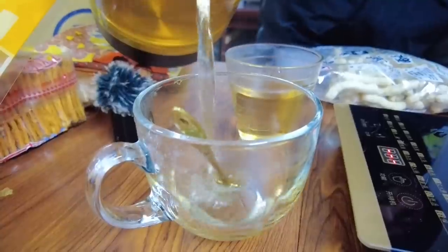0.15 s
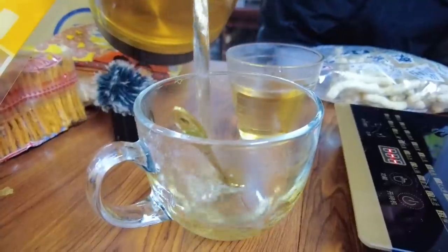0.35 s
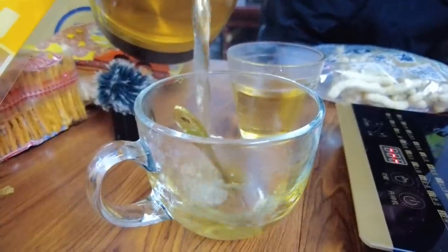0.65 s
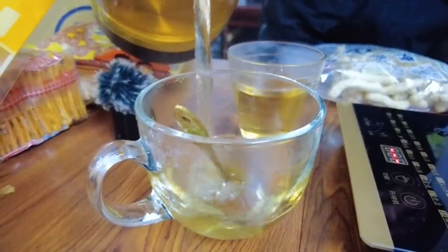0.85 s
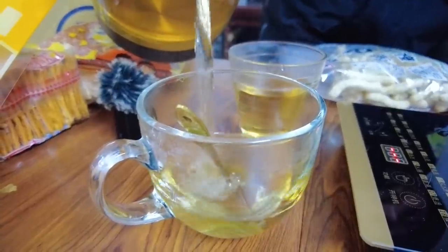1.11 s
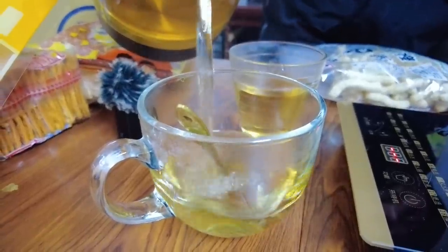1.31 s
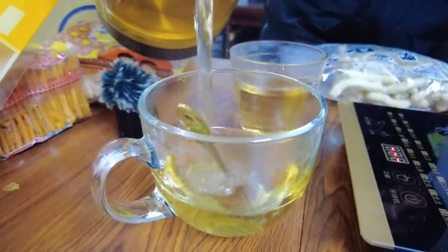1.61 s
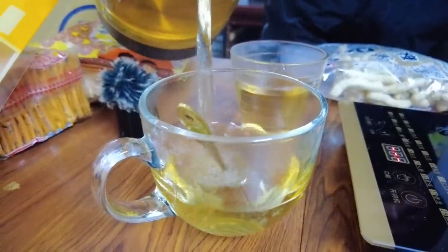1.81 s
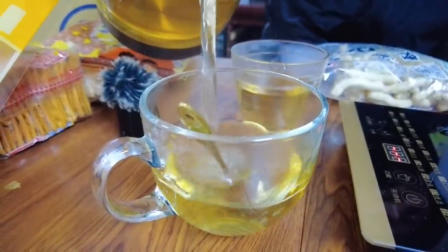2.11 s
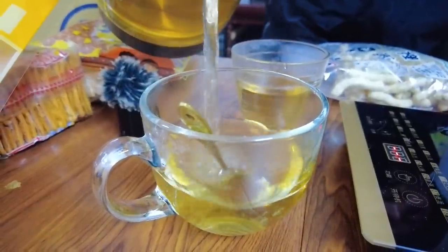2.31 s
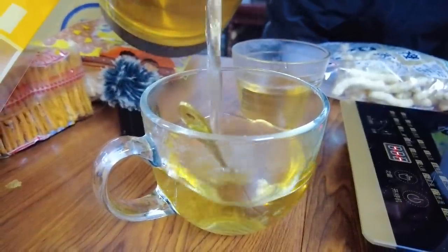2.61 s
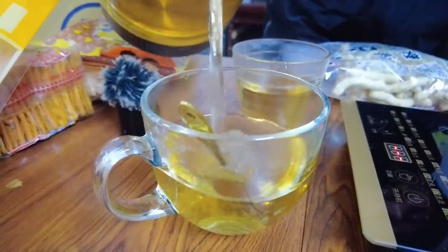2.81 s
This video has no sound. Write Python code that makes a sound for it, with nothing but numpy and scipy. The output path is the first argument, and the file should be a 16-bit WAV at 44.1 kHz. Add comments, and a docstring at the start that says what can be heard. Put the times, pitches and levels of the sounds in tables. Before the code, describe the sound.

Tea pouring steadily into a glass mug, splashing and plopping, with light spoon clinks.

```python
"""Tea pours from a kettle into a glass mug on a wooden table, close to the microphone.
From the start the stream churns and fizzes with tiny bubbles. It breaks into big blobs and many small
drops: each one plops, thumps the mug on the table and splashes. Almost at once, and then now and again,
the stream jogs the spoon, which clinks against the glass. Just before one second, a patch of froth hisses.
As the mug fills, the plops get shorter and the glass rings more briefly."""
import sys
import numpy as np
from scipy import signal
from scipy.fft import rfft, irfft, next_fast_len
from scipy.io import wavfile
from scipy.ndimage import map_coordinates

SR = 44100
rng = np.random.default_rng(int(sys.argv[2]) if len(sys.argv) > 2 else 0)


def dump(signal):
    """Clip the signal to [-1, 1] and save it as 16-bit WAV at the path in sys.argv[1]."""
    limited = np.clip(np.atleast_2d(signal).T, -1, 1)
    pcm = np.round(limited * 32767).astype(np.int16)
    wavfile.write(sys.argv[1], SR, pcm)


N = 130095
LEAD, BRIEF = 512, 2048  # samples before a hit, and in a brief sound
T = (np.arange(12288) - LEAD) / SR  # the clock of one hit in seconds; it lands at 0

# Levels in the tables are relative: the functions turn each sound up or down from there.
# how loud the steady stream is: time_s, churn_db, fizz_db
STREAM_LEVELS = [(0, -47.5, -61.5), (.6, -48.5, -66), (1.05, -49.5, -62.5), (1.55, -54, -67),
                 (2.15, -55.5, -69), (2.5, -52.5, -63.5), (2.95, -49, -64.5)]
# tone of the churning tea: pitch_hz, level_db
CHURN_TONE = [(100, -27), (300, -24), (600, 3.5), (800, 4), (1000, -4), (1250, 0.5), (1600, -14),
              (2100, -2), (2400, -16), (2800, -12), (3500, -58), (6000, -67)]
# tone of the fizz: pitch_hz, level_db
FIZZ_TONE = [(1500, -30), (3000, 1), (4500, 0.5), (7200, 5.5), (8000, -5), (10300, -2), (11500, -13),
             (15000, -11)]
# a typical small drop as the mug fills: time_s, plop_db, thump_db, spatter_db, spray_db
SMALL_DROPS = [(0, -40, -54.5, -48, -55), (.5, -42.5, -57, -54, -70), (.9, -39.5, -43, -57.5, -83),
               (1.5, -47, -43.5, -52.5, -66.5), (2.15, -44, -44.5, -53, -63.5),
               (2.5, -41.5, -41, -52.5, -58.5), (2.95, -43, -43.5, -53, -54)]
# big blobs of tea landing: start_s, plop_db, thump_db, spatter_db, spray_db
BIG_BLOBS = [(0.0403, -45, -59, -31.5, -56), (0.0793, -25.5, -64, -40, -41),
             (0.272, -29.5, -38, -25, -27.5), (0.2955, -29.5, -35, -30, -36),
             (0.3454, -22.5, -41, -33.5, -35), (0.3585, -20, -33.5, -52, -41), (0.3894, -31, -46, -52, -44),
             (0.3981, -25.5, -43, -44.5, -48), (0.4071, -22, -41, -44, -66),
             (0.4422, -27.5, -60, -42.5, -57), (0.534, -34, -51, -49, -59),
             (0.5459, -24.5, -35.5, -36.5, -53), (0.582, -28, -41, -53, -39), (0.6039, -26, -51, -58, -50),
             (0.6451, -12, -24, -32.5, -32.5), (0.7164, -26.5, -29.5, -41, -33.5),
             (0.7892, -43, -28.5, -34.5, -32.5), (0.8643, -18.5, -35.5, -41, -41.5),
             (1.0055, -26.5, -28, -61, -42.5), (1.1181, -22.5, -25.5, -41, -36),
             (1.2693, -27, -35.5, -43, -38), (1.3134, -26.5, -26, -47, -45), (1.353, -22, -39, -35.5, -43),
             (1.3597, -13.5, -17.5, -28.5, -36), (1.435, -36.5, -30.5, -41, -50),
             (1.496, -38, -39, -46, -40.5), (1.5857, -14, -14.5, -40, -63), (1.591, -49, -35, -32.5, -34),
             (1.603, -40, -22, -48, -40), (1.6402, -19.5, -28, -52, -58), (1.6705, -38, -27, -49, -61),
             (1.7095, -30.5, -33, -45, -42.5), (1.753, -55, -28.5, -56, -72),
             (1.8312, -28.5, -22, -55, -71), (1.8733, -38, -26, -30, -39.5),
             (1.898, -30.5, -25.5, -36.5, -40), (2.0005, -28, -27.5, -38, -37),
             (2.0205, -29, -23.5, -59, -68), (2.133, -33, -28, -66, -48.5), (2.2305, -29, -26, -30.5, -46),
             (2.2517, -22, -29, -44, -42), (2.3164, -25.5, -30, -47, -50), (2.354, -40, -30, -50, -60),
             (2.3965, -31, -26, -30, -29), (2.4357, -26.5, -35.5, -40, -56), (2.468, -56, -29, -36.5, -73),
             (2.5724, -23.5, -31, -44.5, -55), (2.6017, -28, -33, -49, -58), (2.6706, -27, -31, -38, -43),
             (2.7035, -29, -30.5, -33, -43), (2.749, -35, -30, -33.5, -41), (2.792, -39, -30, -40, -65),
             (2.896, -28.5, -33.5, -35.5, -41.5), (2.9404, -25.5, -39, -61, -39)]
# notes the wooden table rings at: pitch_hz, level_db, ring_s
TABLE_NOTES = [(94, -18, 0.13), (133, -17.5, 0.12), (262.5, -16, 0.27), (282.5, -11.5, 0.17),
               (370, -5.5, 0.091), (455, -18.5, 0.041), (557, -16, 0.099), (785, -8, 0.044)]
# tone of the table's rattle: pitch_hz, level_db
RATTLE_TONE = [(40, -34), (90, 18.5), (200, 2.5), (310, 6), (400, 9), (660, -2.5), (850, -0.5), (1200, 1),
               (1600, -19), (4000, -36)]
# tone of a splash's wet tick: pitch_hz, level_db
SPATTER_TONE = [(900, -30), (1600, -9), (2100, -2), (2400, -7), (2850, 0), (3100, -3), (3500, -15),
                (5000, -30)]
# tone of its finer spray: pitch_hz, level_db
SPRAY_TONE = [(2500, -25), (4200, 3.5), (5000, -3.5), (6200, 4.5), (7400, 9.5), (8000, 2.5), (9200, 3),
              (10500, -1), (11500, -12), (15000, -14), (17000, -47)]
# single droplets that ping: start_s, level_db
LONE_DROPLETS = [(0.9408, -22.5), (1.069, -36), (1.197, -37), (1.2121, -32), (2.064, -30), (2.076, -32),
                 (2.14, -32), (2.397, -17), (2.622, -31), (2.66, -28.5), (2.8165, -19)]
# the spoon touches the mug: start_s, level_db, extra_treble_db
SPOON_HITS = [(0.077, -46.5, -4), (0.2408, -32, 0.5), (0.3066, -28.5, -3.5), (0.315, -30, -5),
              (0.644, -34.5, 1.5), (0.7123, -45.5, -4), (0.866, -47, 3), (1.362, -33, -2),
              (1.5841, -25.5, -4.5), (1.593, -28.5, -0.5), (1.674, -45.5, -5), (2.2587, -30.5, -4),
              (2.5408, -33.5, -1), (2.567, -35, -4), (2.59, -35.5, -9), (2.599, -38, -7), (2.613, -36, -4),
              (2.718, -39.5, -3), (2.7627, -33.5, -9)]
# notes the mug and the spoon ring at (the spoon's own lie around 5.2-7 kHz): pitch_hz, level_db, ring_s
CLINK_NOTES = [(1534, -21, .12), (3330, -16, .12), (5180, -20, .06), (5560, -7, .09), (5750, -6, .07),
               (5935, -3, .095), (6950, -9, .1), (7142, -9, .11), (8568, -10, .11), (10085, -17, .13),
               (14320, -24, .08)]
# tone of the spoon's own dry tick: pitch_hz, level_db
TICK_TONE = [(3500, -17), (5400, 3), (6900, -3.5), (12000, -29)]
# tone of the froth: pitch_hz, level_db
FROTH_TONE = [(5000, -25), (8000, -4), (10300, 0), (12000, -3), (13500, -7), (16000, -13)]
# tone of the room's low rumble: pitch_hz, level_db
RUMBLE_TONE = [(15, -7), (27, -17), (39, 5), (55, -3.5), (70, -7), (89, 3), (110, -4), (200, -10.5),
               (500, -20), (2000, -62.5)]
# how much the sound spreads to left and right: pitch_hz, spread_db
STEREO_SPREAD = [(400, -40), (1000, -14), (2000, -15), (16000, -18)]
# tone of the microphone hiss: pitch_hz, level_db
HISS_TONE = [(1000, -37), (2600, -27), (3700, -1.5), (7500, -5.5), (10000, -14.5), (16000, -14)]


def amp(db):
    """Turn decibels into a number to multiply by."""
    return 10 ** (np.asarray(db) / 20)


def along(points, hz):
    """Read a table of pitch and level at any pitch."""
    pitches, levels = np.transpose(points)
    return np.interp(np.log(hz + 1), np.log(pitches + 1), levels)


def curves(rows, times):
    """Read each column of a table at the given times."""
    row_times, *columns = np.transpose(rows)
    return [np.interp(times, row_times, column) for column in columns]


def scatter(times):
    """One random value around zero for each time."""
    return rng.standard_normal(len(times))


def filtered(x, gain_at):
    """Turn each pitch in x up or down by gain_at(hz)."""
    length = x.shape[-1]
    padded = next_fast_len(length + 4096)
    return irfft(rfft(x, padded) * gain_at(np.fft.rfftfreq(padded, 1 / SR)), padded)[..., :length]


def noise(tone):
    """Noise with the given tone and an average strength of 1."""
    x = filtered(rng.standard_normal(N), lambda hz: amp(along(tone, hz)))
    return x / np.sqrt(np.mean(x ** 2))


def decay(ring_s):
    """Silent before the hit, then fading by 60 dB in ring_s."""
    return (T >= 0) * amp(-60 * np.abs(T) / ring_s)


def add(track, start_s, sound):
    """Mix one sound, timed by T, into a track with spare room at both ends."""
    start = int(np.clip(round(start_s * SR), 0, N))
    track[start:start + len(sound)] += sound


def played(times, gains, shape):
    """Play one shape, timed by T, at each time with its own strength."""
    hits = np.bincount(np.clip(np.round(times * SR).astype(int), 0, N - 1), gains, N)
    return signal.fftconvolve(hits, shape)[LEAD:LEAD + N]


def puffs(times, db, shape, tone):
    """A puff of noise at each time."""
    return noise(tone) * np.sqrt(np.abs(played(times, amp(db) ** 2, shape ** 2)))


def blips(times, db, pitches, widths_s):
    """Very short tones that swell and fade."""
    out, t = np.zeros(N + len(T)), T[:2 * LEAD]
    for start_s, level, hz, width_s in zip(times, db, pitches, widths_s):
        swell = np.exp(-.5 * (t / width_s) ** 2)
        add(out, start_s, amp(level) * swell * np.sin(2 * np.pi * (hz * t + rng.random())))
    return out[LEAD:LEAD + N]


def stream():
    """The unbroken part of the stream churns and fizzes."""
    churn_db, fizz_db = curves(STREAM_LEVELS, np.arange(N) / SR)
    return amp(churn_db - 6) * noise(CHURN_TONE) + amp(fizz_db - 1) * noise(FIZZ_TONE)


def bubbles(count=1600, per_s=420, clusters_per_s=45, low_hz=1794, high_hz=10570):
    """Tiny bubbles burst at random pitches, in uneven clusters."""
    times = np.cumsum(rng.exponential(1, count)) / per_s
    times = times[times < N / SR]
    hz = low_hz * (high_hz / low_hz) ** rng.random(len(times))
    _, fizz_db = curves(STREAM_LEVELS, times)
    cluster_db = 4 * map_coordinates(rng.standard_normal(count), [times * clusters_per_s])
    db = fizz_db + 6.5 + 3 * scatter(times) + cluster_db
    return blips(times, db, hz, widths_s=2.6 / hz)


def drops(count=1200, per_s=110, scatter_db=7.5, limit_db=14):
    """When and how hard the tea lands: the big blobs among a random patter of small drops."""
    times = np.cumsum(rng.gamma(2, .5, count)) / per_s
    # a drop's four levels vary partly together, partly on their own
    shared, own = rng.standard_normal((count, 1)), rng.standard_normal((count, 4))
    size_db = scatter_db * (shared + own) / np.sqrt(2)
    size_db = limit_db * np.tanh(size_db / limit_db)  # keeps small drops small
    small = np.column_stack([times, np.transpose(curves(SMALL_DROPS, times)) + size_db])
    return np.vstack([BIG_BLOBS, small[times < N / SR]]).T


def plops(times, db, pitch_hz=974.4, shrink_per_s=1.2, sag_per_s=.43):
    """Trapped air wobbles, more briefly as the tea deepens; the biggest pockets sound lowest."""
    widths_s = .00052 + .0012 * np.exp(-shrink_per_s * times)
    stray = .048 * scatter(times) * np.sqrt(times)  # pitches spread out in deeper tea
    hz = pitch_hz * np.exp(stray - sag_per_s * times * amp(db))
    return blips(times, db - .5, hz, widths_s)


def gulps(times, gains, start_hz=733, end_hz=253, fall_s=.01087, peak_s=.007, width_s=.0038):
    """A brief falling tone follows each drop's push on the mug."""
    t = T[:BRIEF]
    glide_hz = (t >= 0) * (end_hz + (start_hz - end_hz) * np.exp(-np.abs(t) / fall_s))
    cycles = np.cumsum(glide_hz) / SR
    swell = amp(-5) * np.exp(-.5 * ((t - peak_s) / width_s) ** 2)
    out = np.zeros(N + len(T))
    for start_s, gain, pitch_ratio in zip(times, gains, np.exp(.15 * scatter(times))):
        add(out, start_s, -gain * swell * np.sin(2 * np.pi * pitch_ratio * cycles))
    return out[LEAD:LEAD + N]


def thumps(times, db, push_s=.0015, push_low_hz=126, table_low_hz=68):
    """Each drop pushes the mug down with a gulp, and the table rings and rattles under it."""
    gains = amp(db - 3.5)
    push = -amp(-1) * np.exp(-.5 * (T / push_s - 1) ** 2)
    push = signal.lfilter(*signal.butter(2, push_low_hz, "high", fs=SR), push)
    out = played(times, gains, push) + gulps(times, gains)
    for hz, level, ring_s in TABLE_NOTES:
        ring = -np.sin(2 * np.pi * hz * T) * decay(ring_s)
        out += played(times, gains * amp(level + 2 * scatter(times)), ring)
    out += puffs(times, db - 8, decay(ring_s=.06), RATTLE_TONE)
    # the deepest bass is taken out of the thumps
    return signal.sosfilt(signal.butter(4, table_low_hz, "high", fs=SR, output="sos"), out)


def pings(times, db, pitch_hz=2625, rise_hz_per_s=83, attack_s=.00114):
    """Droplets ping inside the mug, a little higher as it fills."""
    out, t = np.zeros(N + len(T)), T[:BRIEF]
    shape = decay(ring_s=.0096)[:BRIEF] * (1 - np.exp(-(t / attack_s) ** 2))
    pitches = (pitch_hz + rise_hz_per_s * times) * np.exp(.011 * scatter(times))
    for start_s, level, hz in zip(times, db, pitches):
        add(out, start_s - attack_s, amp(level) * shape * np.sin(2 * np.pi * hz * t))
    return out[LEAD:LEAD + N]


def splashes(times, spatter_db, spray_db, spatter_s=.0016, spray_s=.0013, air_hz=2780):
    """The surface breaks with a ping, a wet tick and a finer spray; the air in the mug rings on."""
    wet = pings(times, spatter_db + .5) + pings(*np.transpose(LONE_DROPLETS))
    wet += puffs(times, spatter_db - 7, 1 / (1 + (T / spatter_s) ** 2), SPATTER_TONE)
    fade = decay(ring_s=.04)
    air_note = fade * np.cos(2 * np.pi * air_hz * T) / np.sum(fade)
    air_ring = amp(2) * signal.fftconvolve(wet, air_note)[LEAD:LEAD + N]
    spray = puffs(times, spray_db - 4.5, 1 / (1 + (T / spray_s) ** 2), SPRAY_TONE)
    return wet + air_ring + spray


def clinks(attack_s=.0017, damping_per_s=.3, treble_hz=6500):
    """The spoon ticks on the mug, which rings more briefly the fuller it is."""
    out = np.zeros(N + len(T))
    attack = 1 - np.exp(-np.abs(T) / attack_s)
    for start_s, db, extra_treble_db in SPOON_HITS:
        shorten = np.exp(-damping_per_s * start_s)
        for hz, level, ring_s in CLINK_NOTES:
            vary, detune, phase = rng.standard_normal(3)
            gain = amp(db + level + 1.5 + 3 * vary + extra_treble_db * (hz > treble_hz))
            shifted_hz = hz * (1 + .005 * detune)  # sloshing tea shifts each note
            note = np.sin(2 * np.pi * (shifted_hz * T + phase))
            add(out, start_s, gain * attack * decay(ring_s * shorten) * note)
    times, db, _ = np.transpose(SPOON_HITS)
    ticks = puffs(times, db - 5, attack * decay(ring_s=.035), TICK_TONE)
    return out[LEAD:LEAD + N] + ticks


def froth(start_s=.79):
    """One blob leaves a patch of froth that hisses away."""
    return puffs(np.array([start_s]), [-57], decay(ring_s=.45), FROTH_TONE)


def room(x, dull_above_hz=3500):
    """The walls add a faint, short, dull echo."""
    tail = (rng.standard_normal(len(T)) * decay(ring_s=.17))[LEAD:]
    echo = signal.fftconvolve(x, tail / np.linalg.norm(tail))[:N]
    return x + amp(-12.5) * filtered(echo, lambda hz: 1 / np.hypot(1, hz / dull_above_hz))


def scene():
    """The pour and the room's rumble sit in the middle; faint microphone hiss spreads to the sides."""
    pour = stream() + bubbles()
    times, plop_db, thump_db, spatter_db, spray_db = drops()
    pour += plops(times, plop_db) + thumps(times, thump_db) + splashes(times, spatter_db, spray_db)
    middle = room(pour + clinks() + froth()) + amp(-47.5) * noise(RUMBLE_TONE)
    # 1j shifts each wave by a quarter cycle, so left and right stay equally loud
    side = filtered(middle, lambda hz: 1j * amp(along(STEREO_SPREAD, hz) - 55))
    side += amp(-69.5) * noise(HISS_TONE)
    return np.array([middle + side, middle - side])


def record(dry, top_hz=15850):
    """The very highest treble is cut off sharply."""
    return filtered(dry, lambda hz: 1 / (1 + (hz / top_hz) ** 120))


dry = scene()
out = record(dry)
dump(out)
```